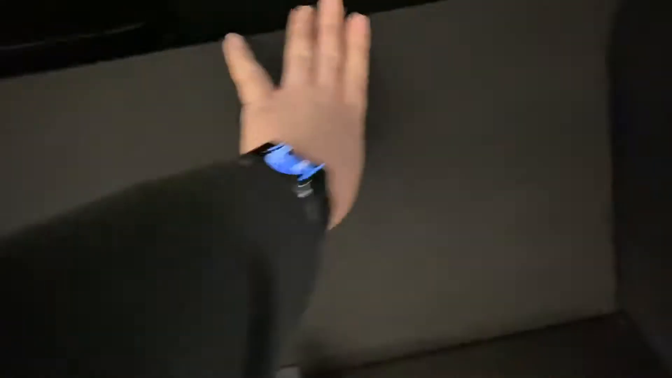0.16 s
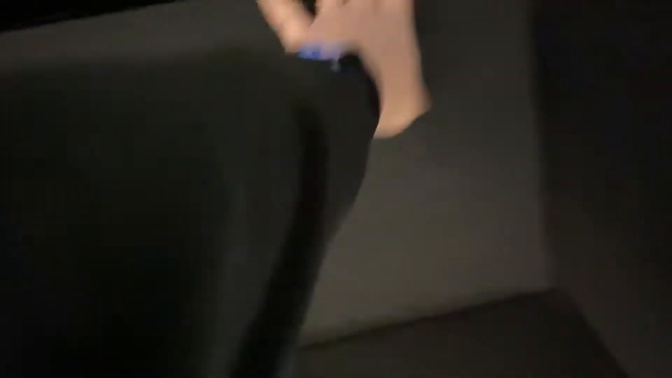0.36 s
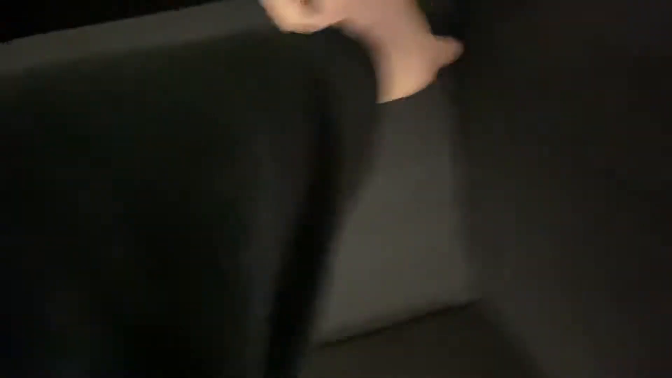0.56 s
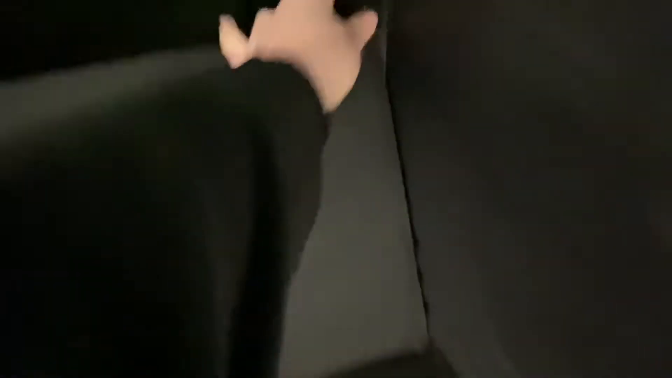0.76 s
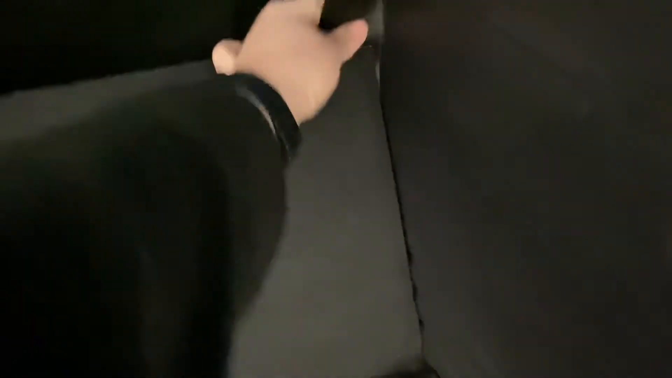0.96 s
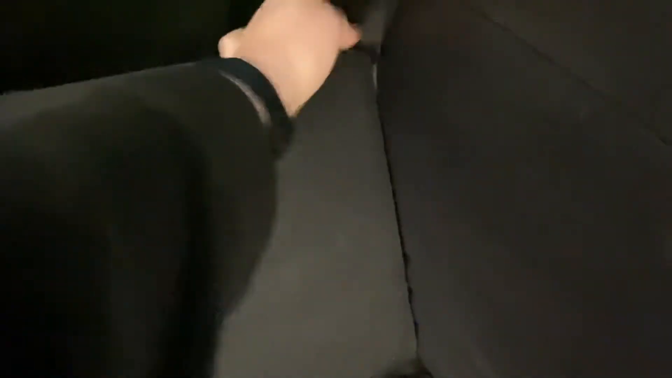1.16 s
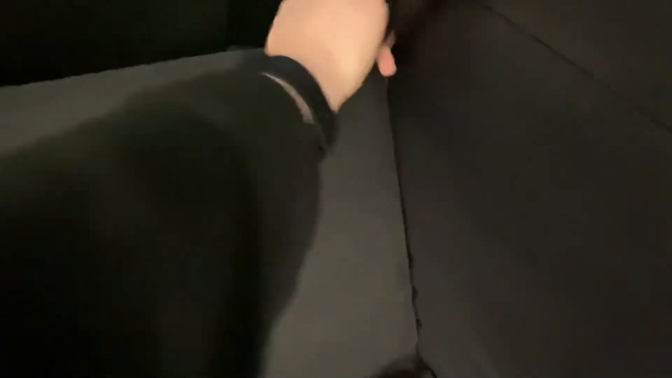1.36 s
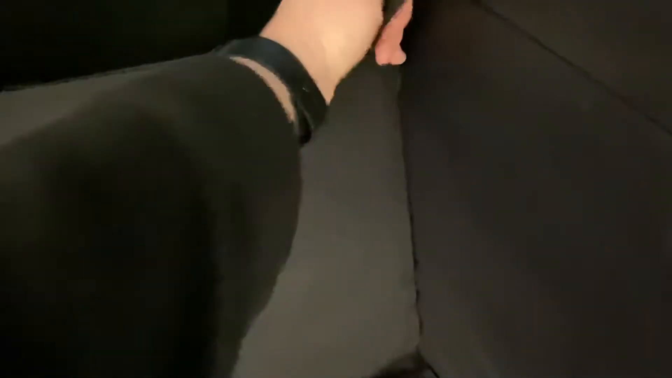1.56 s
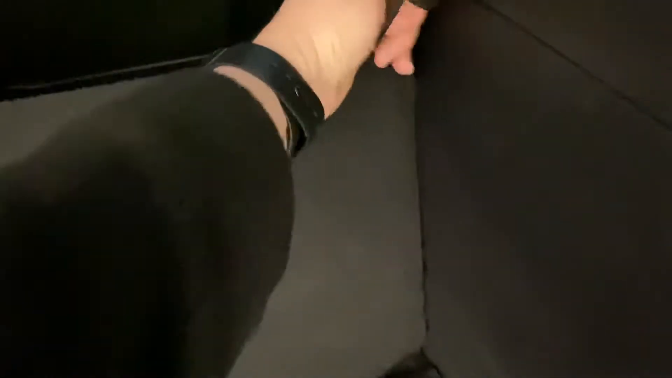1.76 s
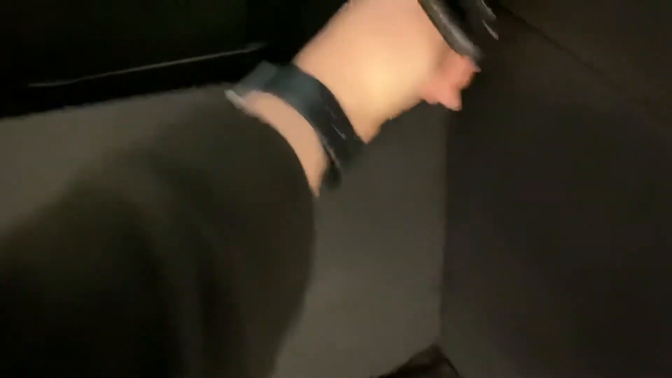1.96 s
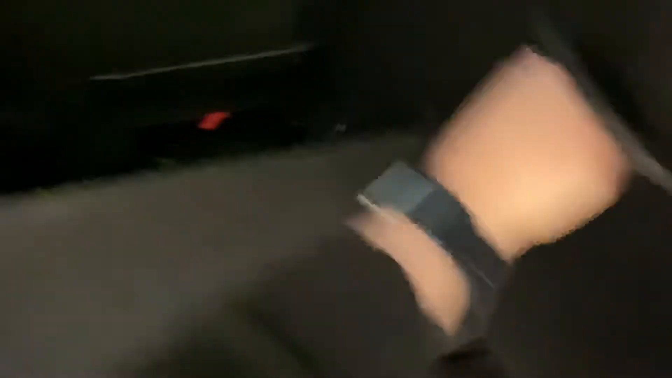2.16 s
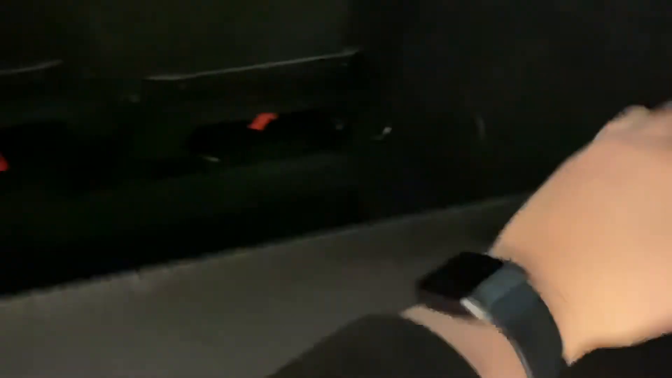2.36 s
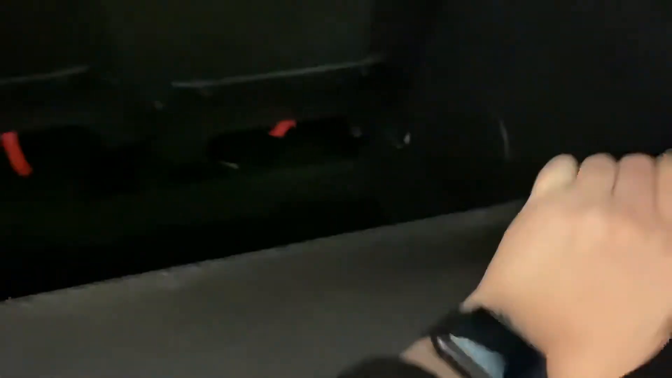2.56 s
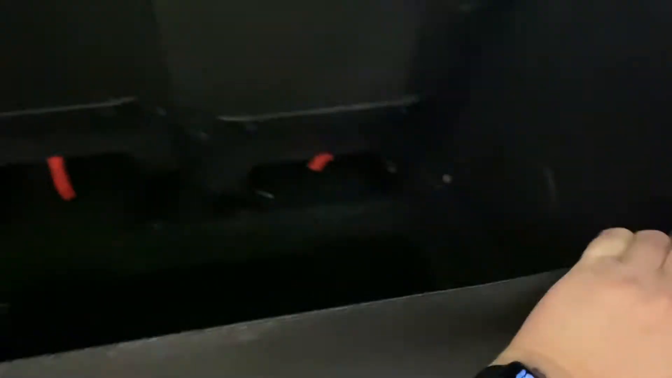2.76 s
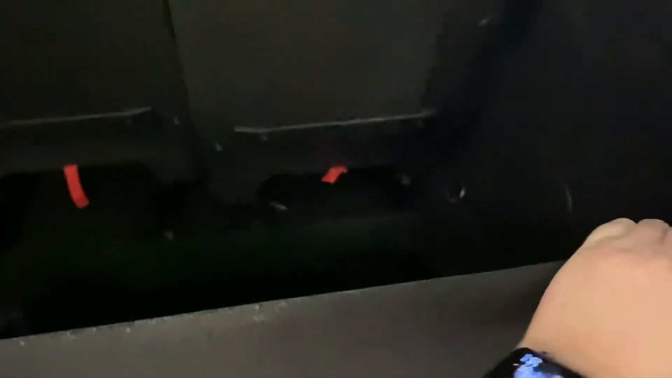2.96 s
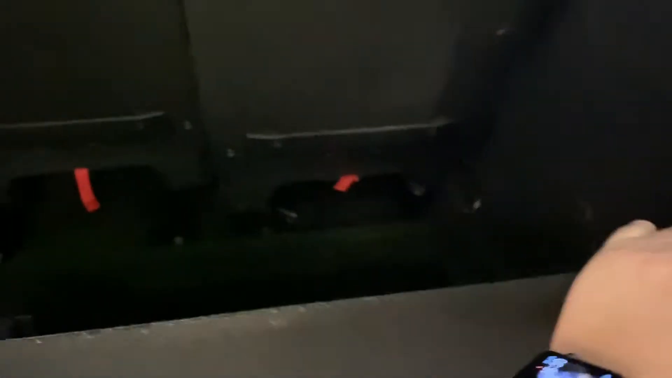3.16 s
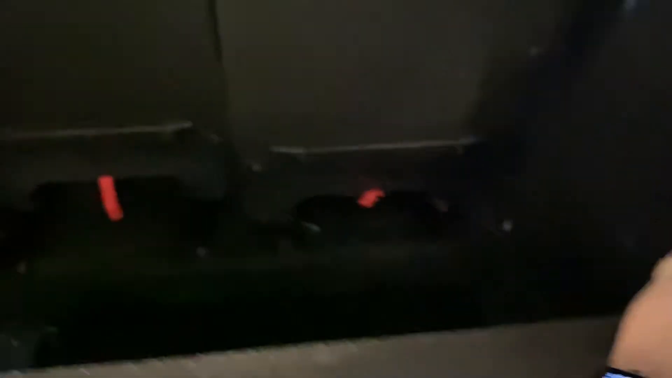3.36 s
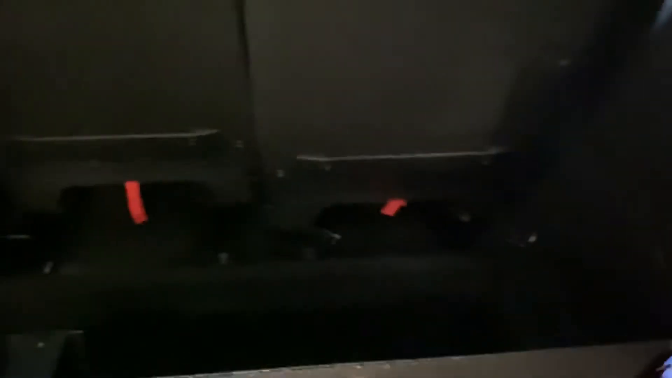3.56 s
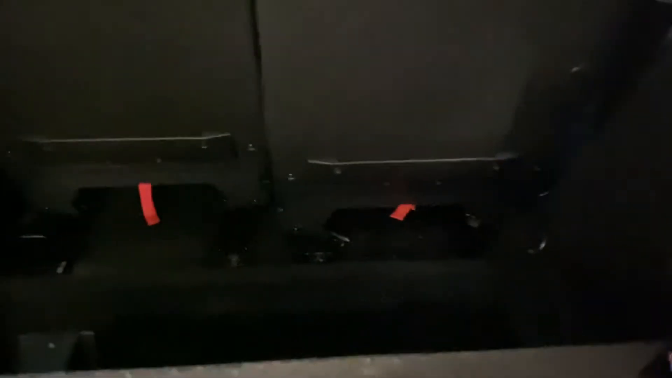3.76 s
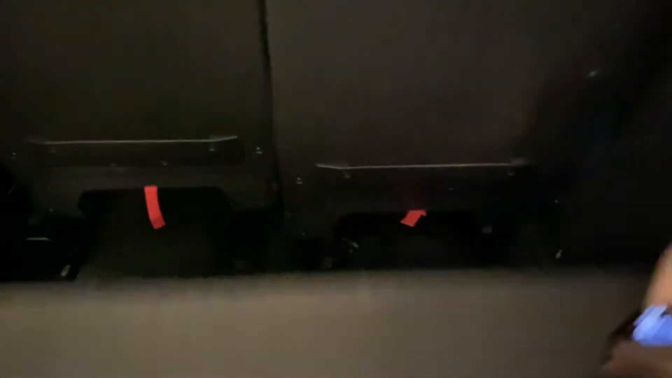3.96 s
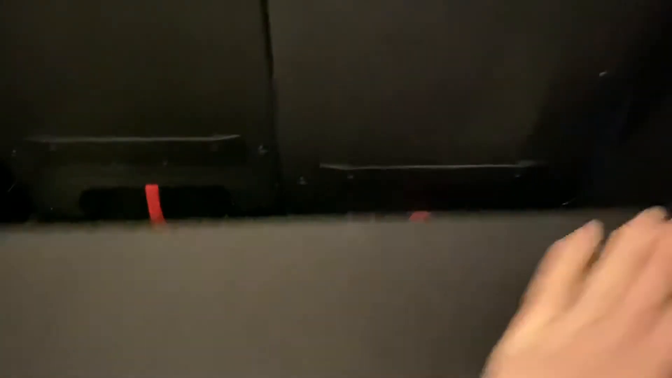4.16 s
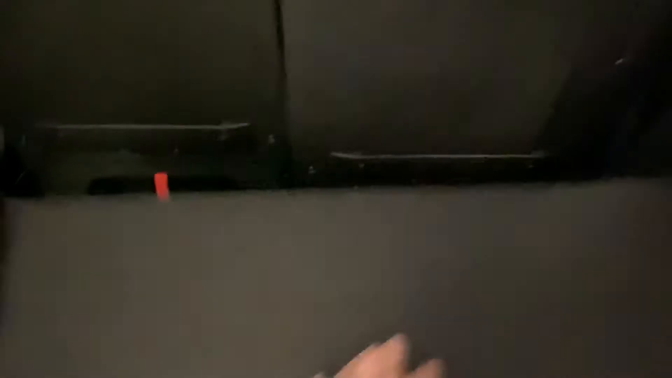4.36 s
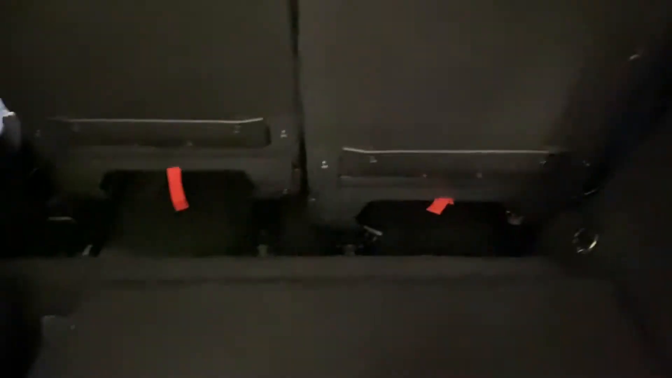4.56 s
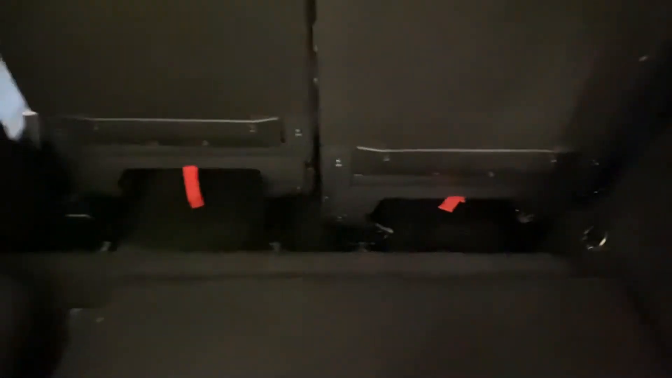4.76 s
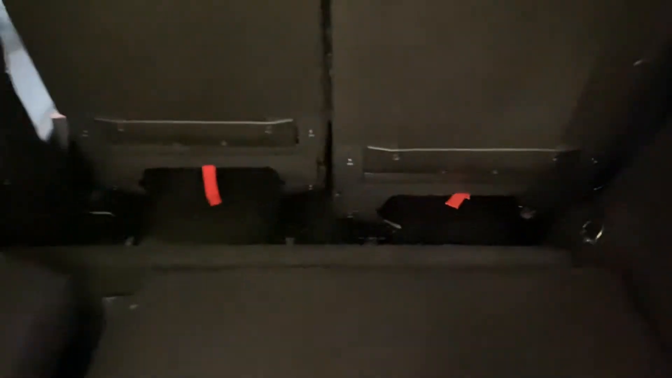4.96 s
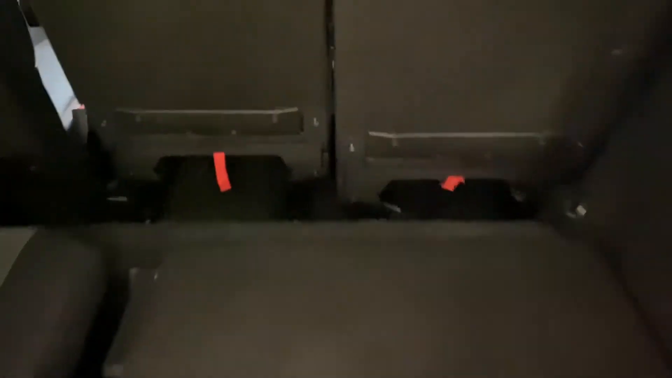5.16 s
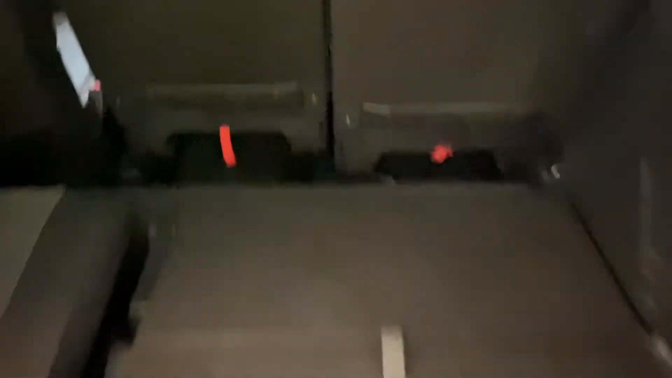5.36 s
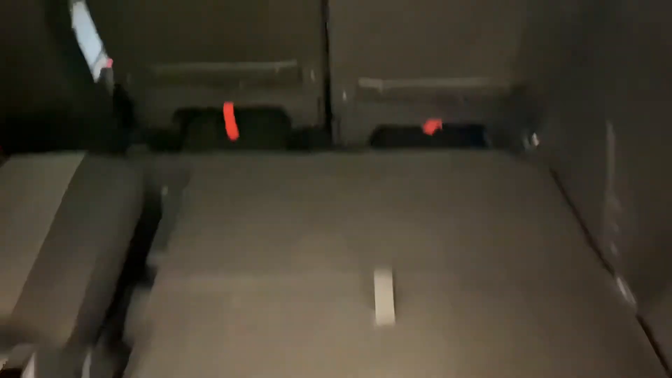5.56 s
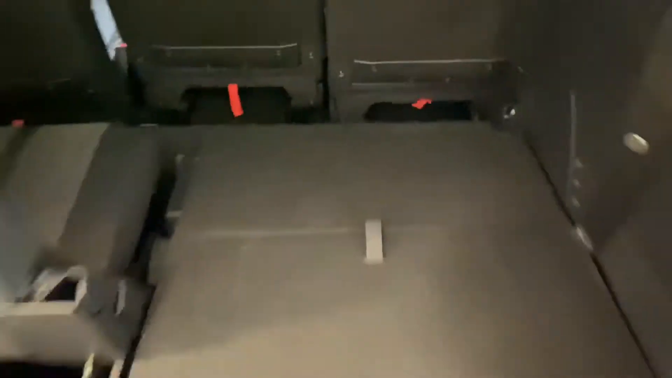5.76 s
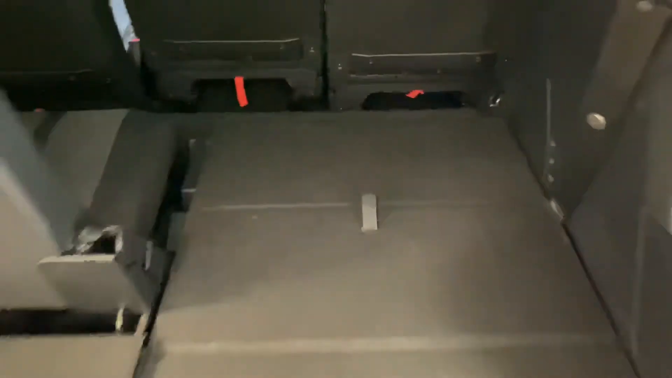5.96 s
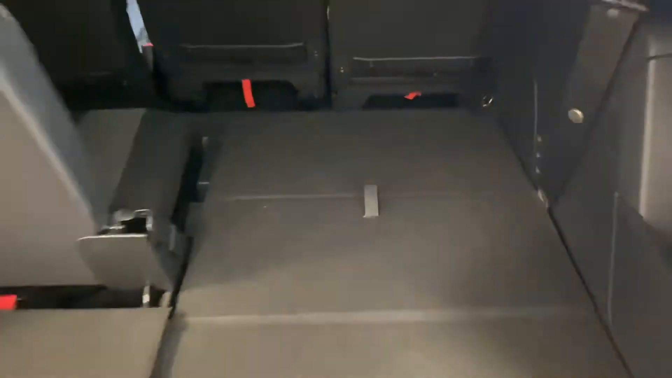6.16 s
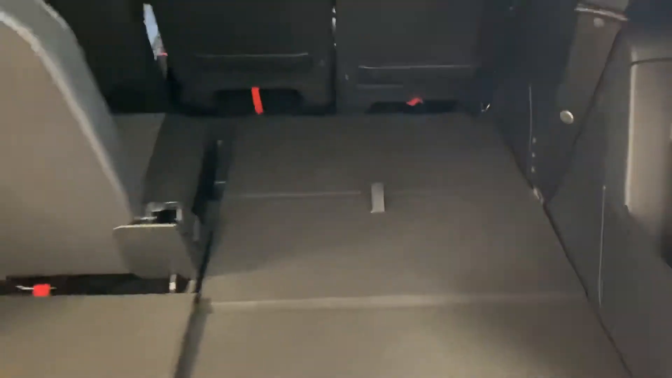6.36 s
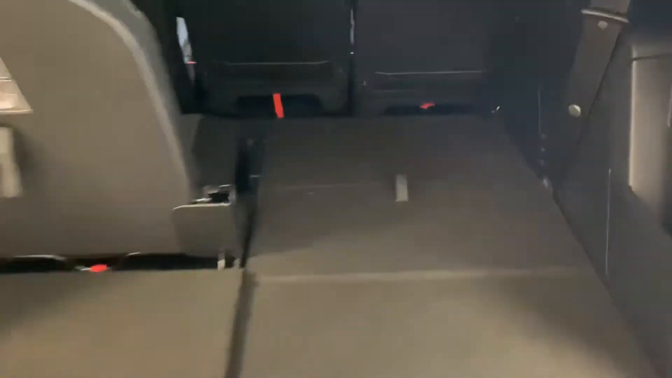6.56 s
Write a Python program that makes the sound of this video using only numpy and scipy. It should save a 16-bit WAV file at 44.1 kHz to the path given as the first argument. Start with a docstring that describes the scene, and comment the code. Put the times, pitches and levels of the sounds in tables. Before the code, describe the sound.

Close stereo microphones in a carpeted car boot. Soft cloth strokes and light knocks on a backrest, then a sharp double latch clack with a hollow knock. A sleeve slides along, a second hard snap and thump follows, joints tick and judder, and the backrest falls with a boomy, clanking thud and a small bounce. Quiet follows.

```python
"""Inside the carpeted boot of a car, two microphones hear a rear seat unlatched by hand and folded flat.
First cloth strokes and small knocks on the backrest (filtered noise, decaying modes) over faint tailgate air.
The latch snaps and clanks (noise cracks, steel modes); a sleeve slides, and a second hard blow follows.
The joints judder and tick (trains of stick-slip rings) until the backrest drops, clanks and bounces.
Damped low tones give the landing its body; the small cabin booms under the blows, its modes rising slowly."""
import sys
import numpy as np
from scipy import signal
from scipy.fft import rfft, irfft, next_fast_len
from scipy.io import wavfile

SR = 44100
rng = np.random.default_rng(int(sys.argv[2]) if len(sys.argv) > 2 else 0)


def to_wav(s):
    """Save 16-bit WAV."""
    ch = np.atleast_2d(s).T  # columns
    pcm = np.round(np.clip(ch, -1, 1) * 32767)  # PCM
    wavfile.write(sys.argv[1], SR, pcm.astype(np.int16))


N = 290619

# Air through the open tailgate: (frequency [Hz], spectrum level [dB])
AMBIENCE_SPECTRUM = [(25, -20), (92, 9.5), (229, -27), (301, -18.5), (840, -14.5), (1100, -24),
                     (1650, -23.5), (7310, -35), (12900, -68), (16000, -47)]
# Likeness of left and right microphones, for air, rubbing and blows: (frequency [Hz], correlation [-1..1])
AIR_LIKENESS = [(60, 0.06), (300, 0.14), (700, 0.37), (1500, 0.068), (15000, .1)]
RUB_LIKENESS = [(60, 0.8), (400, 0.88), (1400, 0.69), (3000, 0.33), (7000, 0.83), (15000, 0.077)]
BLOW_LIKENESS = [(60, .99), (600, .98), (1500, .7), (15000, .85)]
# Left microphone over right: (frequency [Hz], level difference [dB])
BALANCE = [(50, 1.5), (110, 2.5), (220, 12), (350, 5.5), (550, 4.5), (1100, 7.5), (2200, -1.5), (4200, 6),
           (8000, -2), (16000, 2.5)]
# Strokes of cloth on upholstery: (start [s], length [s], padding rub level [dB], fibre hiss level [dB])
STROKES = [(-.08, 0.37, -48, -55), (0.204, 0.37, -67, -58.5), (0.562, 0.2, -51, -57),
           (0.827, 0.21, -46.5, -59.5), (1.305, 0.67, -47.5, -62), (1.861, 0.43, -41.5, -50.5),
           (2.231, 0.33, -38.5, -56), (2.763, 0.2, -51, -59), (3.47, 0.22, -37, -52.5),
           (3.872, 0.28, -64, -46.5), (4.11, 0.49, -41.5, -45.5), (4.7, 1, -85, -59)]
# Colours of padding rub, sleeve swish and fibre hiss: (frequency [Hz], spectrum level [dB])
RUB_SPECTRUM = [(120, -5), (240, -2), (330, 1.5), (430, 4.5), (620, -8.5), (900, -10.5), (1500, -49)]
SWISH_SPECTRUM = [(500, -38), (1000, 1), (1500, 6.5), (1900, 2.5), (2600, 2.5), (3500, -9.5), (6000, -30.5)]
HISS_SPECTRUM = [(1800, -18), (3500, 0.5), (5000, -3), (7400, -3), (8600, -13), (10500, -3), (12000, -10),
                 (13300, -29), (15000, -2.5), (16500, -27)]
# Quick brushes of hand and cloth:
# (middle [s], half length [s], level [dB], pitch [Hz], skirt per octave [dB], rising where positive)
BRUSHES = [(0.714, 0.041, -51.5, 1320, -9.5), (0.953, 0.03, -45.5, 1970, -27),
           (1.122, 0.014, -30, 10000, 11.5), (1.179, 0.016, -38, 2860, -16),
           (4.241, 0.11, -39.5, 3400, -12), (5.189, 0.044, -49.5, 4640, -7)]
# Rumble of the seat on its mounts: (frequency [Hz], spectrum level [dB])
SWAY_SPECTRUM = [(20, -25), (40, 0.5), (60, 2), (105, 0), (150, -0.5), (240, -23.5), (500, -55.5)]
# Low body thumps of the seat's blows and bumps, deep to low-mid: (time [s], level [dB], pitch [Hz])
THUMPS = [(0.447, -29.5, 102.5), (1.208, -22, 231), (1.228, -20, 83.6), (2.373, -16.5, 123),
          (4.453, -13, 180), (4.467, -9, 58.7), (4.497, -10, 69), (4.546, -10, 63.4), (4.665, -24.5, 70.6),
          (4.721, -29, 66), (5.034, -26.5, 120), (5.04, -27, 69), (5.184, -31, 90)]
# Modes of cabin air, unloaded backrest board and plastic shell: (frequency [Hz], level [dB], t60 [s])
CABIN_MODES = [(71.4, -18.5, 0.55), (88, 5.5, 0.057), (112.5, -7.5, 0.29), (159.2, -2.5, 0.11)]
BOARD_MODES = [(348, -8.5, 0.063), (392.3, 0, 0.07), (436.4, 4.5, 0.054), (536, -3, 0.1),
               (545.8, 1.5, 0.077), (688, -10, 0.13), (857.5, -1, 0.063)]
SHELL_MODES = [(920, 21, 0.017), (1100, -19.5, 0.12), (1317, 11, 0.011), (1530, -16, 0.012),
               (2056, -15, 0.079), (2000, -0.5, 0.047), (2320, 10, 0.018)]
# Dense rings of the board and shell: (frequency [Hz], spectrum level [dB])
BOARD_SPECTRUM = [(60, -32), (200, -24.5), (290, -6), (420, 0), (580, -10.5), (850, -21), (1200, -18),
                  (2500, -73), (8000, -94)]
SHELL_SPECTRUM = [(400, 7.5), (800, 13), (1000, -2.5), (1550, 3.5), (2600, -9.5), (3400, -11),
                  (5000, -14.5), (8000, -22), (16000, -37)]
# Resonances of the creaking hinge and trim: (frequency [Hz], level [dB], t60 [s])
HINGE_MODES = [(865, 6.5, 0.044), (944, 11, 0.049), (1072, 2.5, 0.077), (1402, -3, 0.08), (2446, -4, 0.074),
               (2690, -12, 0.11)]
# Dense ring round the hinge resonances: (frequency [Hz], spectrum level [dB])
HINGE_SPECTRUM = [(500, 3), (950, 7.5), (1300, 1.5), (1700, -0.5), (2300, 2.5), (2700, -2), (3200, -10.5),
                  (5000, -17), (9000, -29), (16000, -32)]
# Single short knocks and ticks of the seat, from hand bumps on the backrest and jumps of hinge and trim:
# (time [s], hinge level [dB], board level [dB])
TICKS = [(.132, -43.5, -35.5), (.146, -52, -31), (.517, -56, -36.5), (0.752, -61, -41), (2.298, -31.5, -34),
         (2.302, -37, -40), (2.321, -37.5, -47), (2.7641, -54.5, -34), (3.092, -36, -28.5),
         (3.188, -56, -38), (3.257, -55, -37), (3.293, -66, -37), (3.375, -51.5, -39.5),
         (3.424, -59, -44.5), (3.532, -45, -35.5), (3.568, -48.5, -31.5), (3.782, -38.5, -31.5),
         (3.818, -37.5, -35), (3.8279, -33.5, -30), (3.838, -37, -24), (3.86, -31, -27.5),
         (3.881, -39, -29.5), (3.892, -35.5, -27.5), (3.901, -41, -28), (3.929, -33, -23.5),
         (3.9359, -38, -28), (3.943, -32.5, -24), (3.9595, -32, -26), (3.967, -36, -30),
         (4.337, -41, -29.5), (4.361, -39.5, -28.5), (4.373, -63, -30.5)]
# Stick-slip runs in hinge and trim: (start [s], length [s], board level [dB], hinge level [dB],
# swell over the run [dB], pitch favoured by the joint [Hz], nominal slip rate [1/s], roughness [0..1],
# pitch ratio of the loaded board [1])
JUDDERS = [(0.103, 0.14, -36, -47.5, -16, 850, 153, 0.46, .8),
           (0.637, 0.14, -48, -53.5, 9, 1630, 117, 0.62, .9),
           (1.12, 0.044, -18, -30, 8, 1390, 205, 0.13, 1.0),
           (1.169, 0.013, -24, -27, -9, 1700, 207, 0.77, 1.0),
           (1.232, 0.022, -22.5, -28, -11, 1090, 240, .5, .97),
           (1.439, 0.07, -28.5, -37, 3.5, 1300, 230, 0.5, 1.0),
           (2.262, 0.075, -34.5, -37, 5, 1700, 166, 0.67, .95),
           (2.389, 0.046, -27, -49.5, -1, 800, 104, 0.52, .98),
           (2.459, 0.27, -36.5, -62, -7, 700, 48, .6, 1.02),
           (3.221, 0.16, -37, -59, -22, 2440, 122, 0.56, 1.03),
           (3.789, 0.185, -36, -47, 5, 1000, 170, 0.6, 1.1),
           (4.03, 0.058, -30, -41, 6.5, 830, 155, 0.55, 1.08),
           (4.122, 0.058, -33, -44, -12, 2100, 230, 0.3, 1.03)]
# Latch and buckle clicks: (time [s], snap level [dB], ring pitch [Hz], ring level setting [dB])
CLICKS = [(0.641, -39, 7000, -2), (1.119, -31, 5150, -16), (1.205, -22, 5330, 6.5),
          (1.225, -22.5, 5340, -3), (1.632, -47, 6700, 15), (2.257, -18.5, 6524, 5.5),
          (2.3611, -14.5, 7450, -14), (2.607, -47.5, 5240, 8), (3.571, -34, 7060, -17),
          (3.6023, -40, 7050, -13), (4.4655, -18.5, 7060, -23)]
# Crack of the metal snap: (frequency [Hz], spectrum level [dB])
SNAP_SPECTRUM = [(800, -43), (2500, 4.5), (4000, -6.5), (7000, -5.5), (9000, -12), (11000, 0.5),
                 (13000, -18), (15000, 1), (17000, -48)]
# Steel modes of latch and seat frame: (frequency [Hz], level [dB], t60 [s])
LATCH_MODES = [(850, -16, 0.045), (1070, 0.5, 0.022), (1154, -6, 0.054), (1576, 3.5, 0.035),
               (1920, -7, 0.067), (3470, -14, 0.052)]
FRAME_MODES = [(1272, 7, 0.05), (1380, 0.5, 0.04), (1970, -2, 0.038), (2300, -4, 0.045), (2520, 2, 0.049),
               (2895, -3, 0.06), (3430, -12, 0.027)]
# Steel clanks of latch and seat frame: (time [s], level [dB])
LATCH_BLOWS = [(1.2068, -18), (1.225, -22)]
FRAME_BLOWS = [(4.4486, -22), (4.465, -20)]
# Blows on the backrest: (time [s], board level [dB], shell level [dB],
# pitch favoured in the shell [Hz], pitch favoured in the board [Hz])
KNOCKS = [(0.097, -32, -42, 1000, 330), (0.641, -46, -43, 2080, 450), (1.206, -14.5, -16.5, 2000, 410),
          (1.225, -21, -21.5, 1290, 388), (1.295, -30.5, -45, 1000, 446), (1.342, -31.5, -42.5, 1140, 464),
          (1.456, -33, -30.5, 950, 517), (1.4641, -29, -29.5, 1100, 400), (1.566, -35, -38, 1410, 430),
          (2.2568, -25, -22, 2900, 540), (2.362, -10.5, -24, 1350, 472), (2.750, -31.5, -54, 970, 527),
          (3.092, -30, -32.5, 900, 515), (3.14, -30.5, -53, 995, 500), (3.215, -31.5, -60, 1000, 450),
          (3.549, -30.5, -63, 900, 426), (3.522, -37.5, -53, 1500, 490), (4.057, -34, -39, 1006, 450),
          (4.208, -24, -36.5, 1620, 430), (4.448, -22, -14.5, 2640, 430), (4.451, -9, -26, 1300, 440),
          (4.459, -25, -16, 900, 750), (4.465, -17, -17, 2400, 476), (4.4812, -11.5, -26.5, 2010, 402),
          (4.538, -21.5, -31.5, 1000, 357)]

AMBIENCE_DB, HUM_HZ, HUM_DB = -48, 292, -60
REST_RUB_DB, REST_SWISH_DB, REST_HISS_DB = -57.5, -62.5, -65.5   # clothes stirring between strokes
STROKE_SKEW, STROKE_ROUNDING = 0.65, 1   # speed peaks before the middle; softness of start and stop
SLEEVE_S, SLEEVE_LENGTH_S, SLEEVE_DB = 1.315, 0.99, -46   # sleeve along the backrest as the hand pulls
SWAY_DB, SWAY_FOLLOWS, SWAY_SETTLE_S = -28, 0.45, 0.019   # full-scale level; dB per dB of activity; lag
THUMP_CYCLES = 14   # cycles until a thump has fallen by 60 dB
BOOM_DB, BOOM_FOLLOWS = -8, 0.83   # cabin level under a 0 dB board blow; dB per dB on the board
STRAINED_HZ, TICK_HZ = 491, 2420   # pitches favoured: board in ticks and judders; hinge in a tick
HINGE_SOFTENING_DB = 2   # dulls the board's share of ticks and judders
HINGE_RISE_S = 0.00023   # short rise that rounds the start of each hinge tick
TICK_TENSION, TENSION_SPREAD = 1.05, .03   # the loaded board rings higher; scatter of its log pitch
SLIP_SCATTER, SLIP_VARY_DB = .55, 4   # spread of log gap and of strength at roughness 1
GRIP_S = 0.00063   # time constant of the joint taking up its load
RIGHT_LAG_S = 0.000027   # the right microphone is about 9 mm of sound path farther from the seat
CUTOFF_HZ = 16200
RING_SIZE = 22050   # samples, half a second
AGE = np.arange(RING_SIZE) / SR   # seconds since a contact
TIME = np.arange(N) / SR


def from_db(db):
    """Decibels to gain."""
    return 10 ** (np.asarray(db) / 20)


def rms_one(x):
    """Scale to rms 1."""
    return x / np.sqrt(np.mean(x ** 2) + 1e-20)


def unit_blow(x):
    """Scale a stereo ring to the energy of 20 ms at rms 1."""
    return x / np.sqrt(np.sum(x ** 2) / (2 * .02 * SR) + 1e-20)


def at_hz(points, hz):
    """Read a spectrum on a log-frequency axis."""
    f, value = np.transpose(points)
    return np.interp(np.log(np.maximum(hz, 1)), np.log(f), value)


def favour(points, gain_db):
    """Weight the rows of a mode table or spectrum by a function of pitch."""
    return [(hz, level_db + gain_db(hz), *rest) for hz, level_db, *rest in points]


def emphasis(hz, focus_hz, height_db, octaves):
    """A bell-shaped lift in dB round the pitch that a contact favours."""
    return height_db * np.exp(-(np.log2(hz / focus_hz) / octaves) ** 2)


def add(track, s, sound):
    """Mix a sound in at time s, cut at the end of the track."""
    start = max(round(s * SR), 0)
    track[:, start:start + sound.shape[-1]] += sound[:, :N - start]


def drift(per_s):
    """Random wander through up to 4000 normally spread points, holding the last once they run out."""
    return np.interp(TIME * per_s, np.arange(4000), rng.standard_normal(4000))


def noise(spectrum, likeness, size):
    """Stereo noise of a given colour and left-right likeness, rms 1."""
    padded = next_fast_len(size)
    hz = np.fft.rfftfreq(padded, 1 / SR)
    mid, side = rfft(rng.standard_normal((2, padded)))
    alike = np.clip(at_hz(likeness, hz), -.99, .99)
    pair = np.sqrt(1 + alike) * mid + np.sqrt(1 - alike) * side * [[1], [-1]]
    coloured = pair * from_db(at_hz(spectrum, hz))
    return rms_one(irfft(coloured, padded)[:, :size])


def decay(t60):
    """Envelope that falls 60 dB in t60."""
    return np.exp(-np.log(1000) * AGE / t60)


def onset(rise_s):
    """Envelope that closes in on 1 with time constant rise_s."""
    return 1 - np.exp(-AGE / rise_s)


def ring(modes, vary_db, phase_spread):
    """Struck modes: strengths change with the contact point, phases with the microphone."""
    out = 0
    for k, (hz, level_db, t60) in enumerate(modes):
        phase = phase_spread * rng.standard_normal() * np.array([[1], [-1]])
        strength = (-1) ** k * from_db(level_db + vary_db * rng.standard_normal())
        out = out + strength * decay(t60) * np.sin(2 * np.pi * hz * AGE + phase)
    return unit_blow(out)


def ambience():
    """Faint air through the open tailgate, with a wavering hum."""
    air = from_db(AMBIENCE_DB) * noise(AMBIENCE_SPECTRUM, AIR_LIKENESS, size=N)
    hum = np.sin(2 * np.pi * np.cumsum(HUM_HZ + 2.97 * drift(per_s=8.4)) / SR)
    hum_db = HUM_DB + np.array([[5.0], [-1.5]])   # left, right
    return air + from_db(hum_db) * hum


def reflections(hz, strength, count):
    """Glass and hard trim close by throw the treble back within a few milliseconds."""
    delays = rng.uniform(.0005, .004, (count, 1, 1)) + rng.normal(0, .00001, (count, 2, 1))
    echoes = np.exp(-2j * np.pi * hz * delays).sum(axis=0) / np.sqrt(count)
    share = strength * hz / (hz + 2800)
    return (1 + share * echoes) / np.sqrt(1 + share ** 2)


def sway(contacts):
    """Whatever touches the seat sets it rumbling on its mounts; the rumble settles afterwards."""
    keep = np.exp(-1 / (SWAY_SETTLE_S * SR))
    activity = signal.lfilter([1 - keep], [1, -keep], np.abs(contacts[0]))   # left channel
    rumble = noise(SWAY_SPECTRUM, RUB_LIKENESS, size=N)
    return from_db(SWAY_DB) * activity ** SWAY_FOLLOWS * rumble


def boom():
    """The cabin air swings at its lowest modes, building up over some 20 ms."""
    return ring(CABIN_MODES, vary_db=1.0, phase_spread=0.38) * onset(0.02)


def stroke(s, length):
    """Speed of one stroke of the arm: it gathers quickly and eases off."""
    progress = np.clip((TIME - s) / length, 0, 1)
    return np.abs(np.sin(np.pi * progress ** STROKE_SKEW)) ** STROKE_ROUNDING


def handling():
    """Cloth drags over upholstery; uneven pressure and catching fibres make the rubbing flutter."""
    padding = fibres = 0
    for s, length, rub_db, hiss_db in STROKES:
        speed = stroke(s, length)
        padding = padding + from_db(rub_db) * speed
        fibres = fibres + from_db(hiss_db) * speed
    sleeve = np.hypot(fibres, from_db(SLEEVE_DB) * stroke(SLEEVE_S, SLEEVE_LENGTH_S))
    catch = drift(per_s=820)   # the flutter holds steady after about 4.9 s
    pressure = from_db(1.5 * drift(per_s=32))

    def rubbing(level, rest_db, flutter_db, spectrum):
        """Rubbing noise over a resting floor, its level fluttering as the fibres catch."""
        envelope = np.hypot(level, from_db(rest_db)) * from_db(flutter_db * catch)
        return envelope * noise(spectrum, RUB_LIKENESS, size=N)

    rub = rubbing(padding, REST_RUB_DB, 0.62, RUB_SPECTRUM)
    swish = rubbing(sleeve, REST_SWISH_DB, 1.9, SWISH_SPECTRUM)
    hiss = rubbing(fibres, REST_HISS_DB, 2.05, HISS_SPECTRUM)
    return pressure * (rub + swish + hiss)


def brushes():
    """A quick stroke of hand or cloth swells and fades as shaped noise."""
    out = np.zeros((2, N))
    for s, half_length, level_db, hz, skirt_db in BRUSHES:
        band = [(hz / 8, 3 * skirt_db), (hz / 2, skirt_db), (hz, 0),
                (hz * 2, skirt_db), (hz * 8, 3 * skirt_db)]
        swell = np.exp(-(AGE / half_length - 2) ** 2)
        brush = swell * noise(band, RUB_LIKENESS, size=RING_SIZE)
        add(out, s - 2 * half_length, from_db(level_db) * brush)
    return out


def thumps():
    """Low body thumps of the seat's blows and bumps: each a damped tone, deep to low-mid."""
    out = np.zeros((2, N))
    for s, level_db, hz in THUMPS:
        tone = np.sin(2 * np.pi * hz * AGE + np.array([[.3], [-.3]]))
        add(out, s, from_db(level_db) * tone * decay(THUMP_CYCLES / hz) * onset(0.00064))
    return out


def clicks():
    """Metal snaps home: a sharp crack, a short scatter and one ringing pitch."""
    out = np.zeros((2, N))
    for s, level_db, hz, ring_db in CLICKS:
        fall = decay(0.007) + from_db(-20.0) * decay(0.025)
        snap = noise(SNAP_SPECTRUM, BLOW_LIKENESS, size=RING_SIZE) * fall
        phase = rng.uniform(0, np.pi / 2, (2, 1))
        tone = np.sin(2 * np.pi * hz * AGE + phase) * decay(0.032)
        add(out, s, from_db(level_db + 2.5) * (snap + from_db(ring_db - 7.5) * tone))
    return out


def clanks():
    """Steel meets steel, damped by the padding: the latch as it lets go, the frame as it lands."""
    out = np.zeros((2, N))
    for modes, blows in ((LATCH_MODES, LATCH_BLOWS), (FRAME_MODES, FRAME_BLOWS)):
        for s, level_db in blows:
            steel = ring(modes, vary_db=2.0, phase_spread=0.5)
            add(out, s, from_db(level_db) * steel * onset(0.00047))
    return out


def panel(modes, spectrum, gain_db, t60, dense_db, crack_db, crack_s, rise_s, phase_spread):
    """A panel's main modes, its first crack and the dense ring of the trim around it."""
    fall = decay(t60) + from_db(crack_db) * decay(crack_s)
    dense = unit_blow(noise(favour(spectrum, gain_db), BLOW_LIKENESS, size=RING_SIZE) * fall)
    clear = ring(favour(modes, gain_db), vary_db=2.5, phase_spread=phase_spread)
    return unit_blow((clear + from_db(dense_db) * dense) * onset(rise_s))


def board(hardness_db, focus_hz, tension=1):
    """The backrest's hollow knock: the place struck picks its note, hard contacts wake higher modes."""
    def colour_db(hz):
        """Treble tilt by hardness plus a lift round the favoured note."""
        tilt = 0.72 * (hardness_db + 10.5) * np.log2(hz / 450)
        return tilt + emphasis(hz, focus_hz, height_db=9.0, octaves=0.35)
    modes = [(hz * tension, level_db, t60) for hz, level_db, t60 in BOARD_MODES]
    return panel(modes, BOARD_SPECTRUM, colour_db, t60=0.12, dense_db=-1.0, crack_db=5.0,
                 crack_s=.045, rise_s=0.00066, phase_spread=0.18)


def strained_board(hardness_db, tension):
    """The board under a changing load, which shifts its notes a little at each draw."""
    shift = tension * np.exp(TENSION_SPREAD * rng.standard_normal())
    return board(hardness_db, STRAINED_HZ * tension, shift)


def hinge(focus_hz):
    """One short, dry tick of the hinge, strongest round the pitch that the joint favours."""
    def focus_db(hz):
        """Lift round the favoured pitch."""
        return emphasis(hz, focus_hz, height_db=7.5, octaves=0.31)
    grain = noise(favour(HINGE_SPECTRUM, focus_db), BLOW_LIKENESS, size=RING_SIZE)
    dense = unit_blow(grain * decay(0.028))
    clear = ring(favour(HINGE_MODES, focus_db), vary_db=1.5, phase_spread=0.94)
    return unit_blow((clear + dense) * onset(HINGE_RISE_S))


def ticks():
    """Single short knocks and ticks of the seat: hand bumps on the backrest, jumps of hinge and trim."""
    out = np.zeros((2, N))
    for s, hinge_db, board_db in TICKS:
        knock = strained_board(hinge_db - board_db - HINGE_SOFTENING_DB, TICK_TENSION)
        add(out, s, from_db(hinge_db) * hinge(TICK_HZ) + from_db(board_db) * knock)
    return out


def slip_train(at, strengths, rings):
    """Slips fall at random on a few contact spots, each with a ring of its own."""
    spots = rng.integers(0, len(rings), len(at))
    slips = np.zeros((len(rings), 1, RING_SIZE))
    slips[spots, 0, (at * SR).astype(int)] = strengths
    return unit_blow(signal.fftconvolve(slips, np.array(rings), axes=2).sum(axis=0))


def judders(count=2):
    """Dry joints stick and slip: each slip ticks in the hinge and knocks the board; even slips groan."""
    out = np.zeros((2, N))
    for s, length, board_db, hinge_db, swell_db, focus_hz, slips_per_s, rough, tension in JUDDERS:
        gaps, sizes = rng.standard_normal((2, 128))
        at = np.cumsum(np.exp(rough * SLIP_SCATTER * gaps)) / slips_per_s
        at = np.minimum(at - at[0], AGE[-1])
        running = at < min(length, AGE[-1])
        grip = running * (1 - np.exp(-(at + 1 / slips_per_s) / GRIP_S))
        slip_db = rough * SLIP_VARY_DB * sizes + swell_db * np.minimum(at / length, 1)
        strengths = grip * from_db(slip_db)
        hardness_db = hinge_db - board_db - HINGE_SOFTENING_DB / 2
        boards = [strained_board(hardness_db, tension) for spot in range(count)]
        hinges = [hinge(focus_hz) for spot in range(count)]
        knocking = from_db(board_db) * slip_train(at, strengths, boards)
        ticking = from_db(hinge_db) * slip_train(at, strengths, hinges)
        add(out, s, np.sqrt(length / .02) * (knocking + ticking))   # longer runs carry more energy
    return out


def shell(focus_hz):
    """The plastic shell's clack: a dry crack and short ring round the pitch that the contact favours."""
    def focus_db(hz):
        """Broad lift round the favoured pitch."""
        return emphasis(hz, focus_hz, height_db=12.0, octaves=0.96)
    return panel(SHELL_MODES, SHELL_SPECTRUM, focus_db, t60=.06, dense_db=6.5, crack_db=7,
                 crack_s=.016, rise_s=.0005, phase_spread=.35)


def knocks():
    """Hard blows sound board and shell; the harder the blow, the more the cabin booms."""
    out = np.zeros((2, N))
    for s, board_db, shell_db, shell_hz, board_hz in KNOCKS:
        knock = from_db(board_db) * board(shell_db - board_db, board_hz)
        clack = from_db(shell_db) * shell(shell_hz)
        cabin = from_db(BOOM_DB + BOOM_FOLLOWS * board_db) * boom()
        add(out, s, knock + clack + cabin)
    return out


def scene():
    """The seat lies nearer the left microphone: earlier there, and louder at most pitches."""
    contacts = handling() + brushes() + thumps() + clicks() + clanks() + ticks() + judders() + knocks()
    seat = contacts + sway(contacts)
    padded = next_fast_len(N + RING_SIZE)
    hz = np.fft.rfftfreq(padded, 1 / SR)
    balance = from_db(at_hz(BALANCE, hz) * np.array([[.5], [-.5]]))
    lag = np.exp(-2j * np.pi * hz * RIGHT_LAG_S * np.array([[0], [1]]))
    path = balance * lag * reflections(hz, strength=0.87, count=6)
    return irfft(rfft(seat, padded) * path, padded)[:, :N] + ambience()


def record(dry):
    """The microphones shed the deepest rumble, the loudest peaks are rounded and the top is cut."""
    lean = signal.sosfilt(signal.butter(4, 44, "high", fs=SR, output="sos"), dry)
    rounded = 1.14 * np.tanh(lean / 1.415)
    top_cut = signal.ellip(10, .3, 80, CUTOFF_HZ, fs=SR, output="sos")
    return signal.sosfilt(top_cut, rounded)


dry = scene()
out = record(dry)
to_wav(out)
```